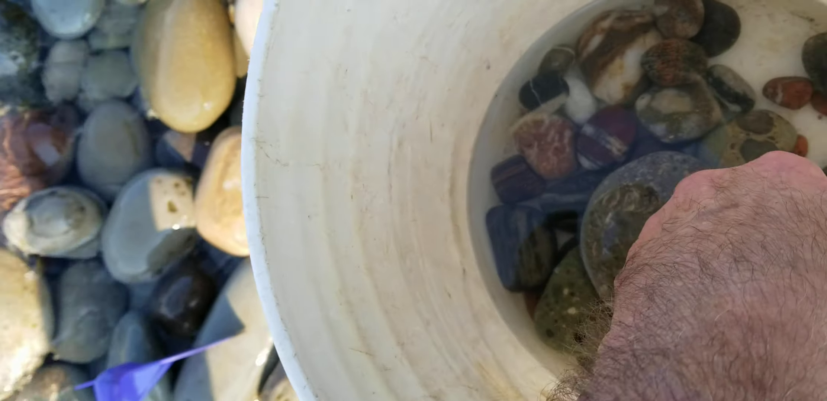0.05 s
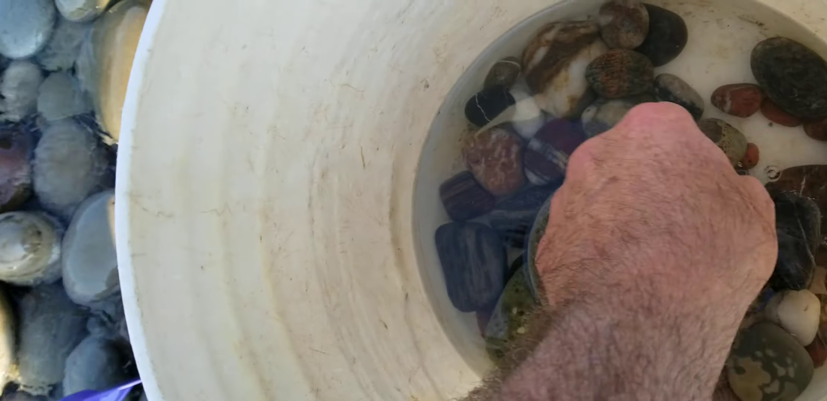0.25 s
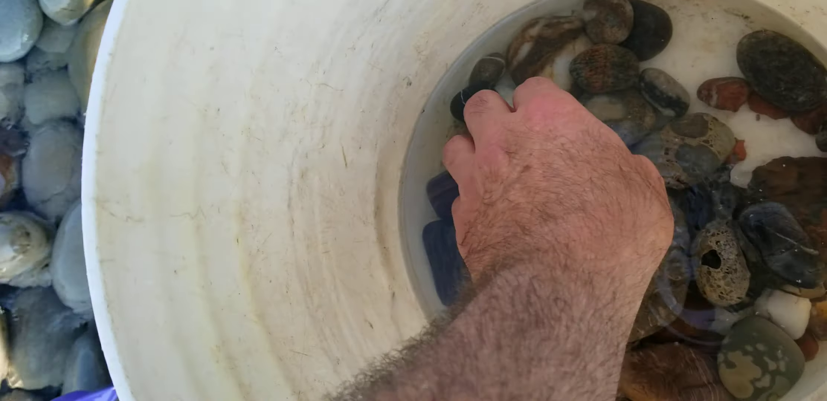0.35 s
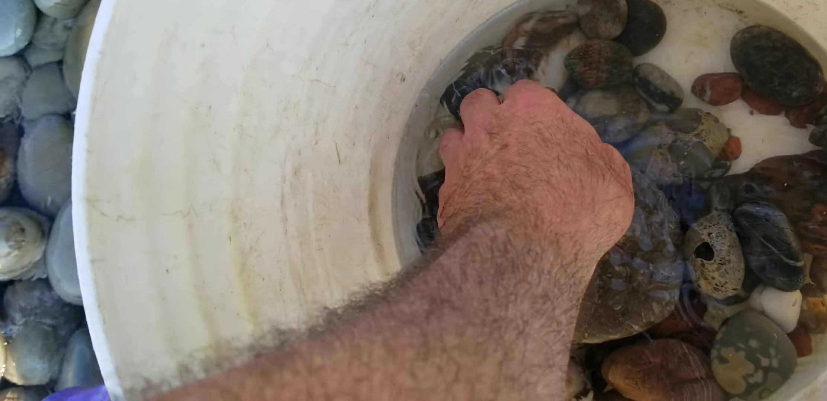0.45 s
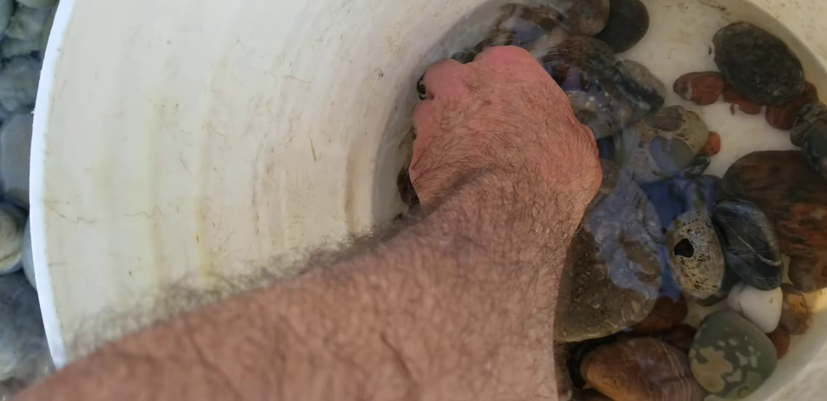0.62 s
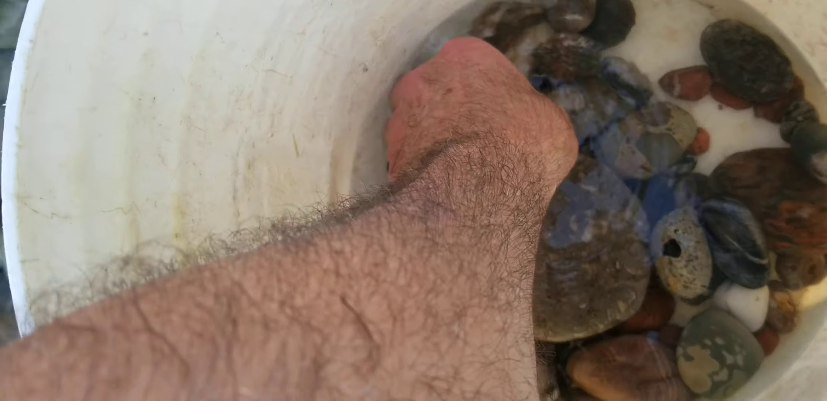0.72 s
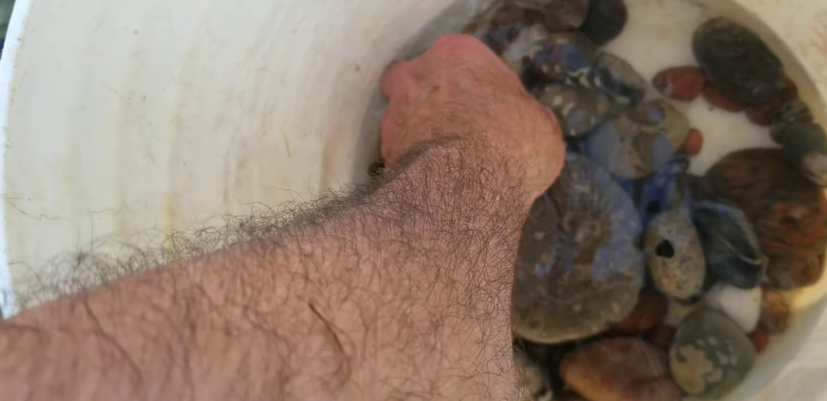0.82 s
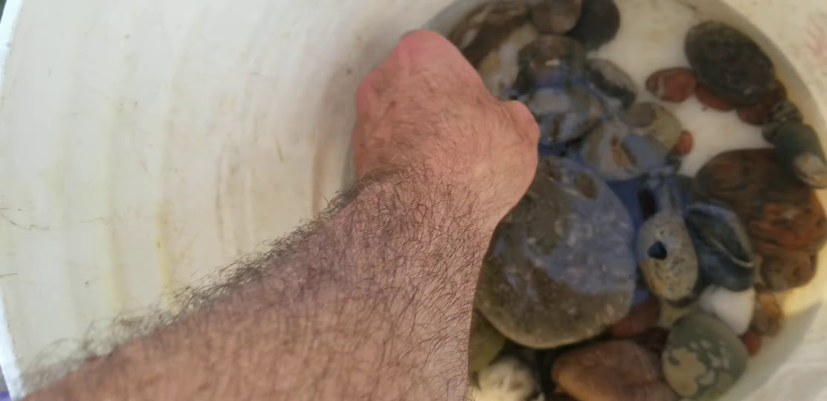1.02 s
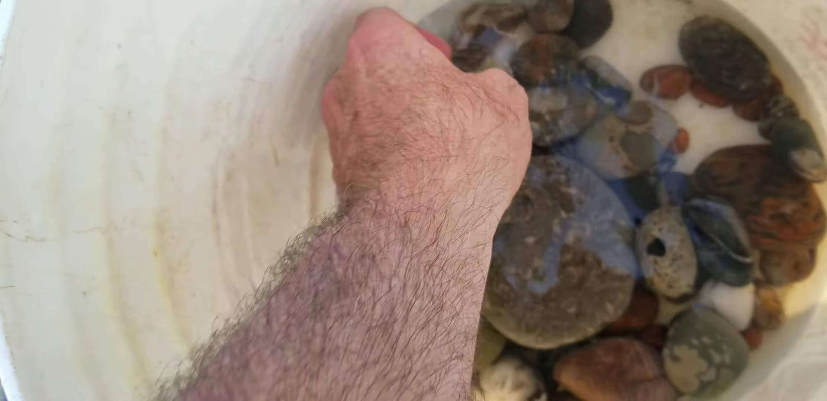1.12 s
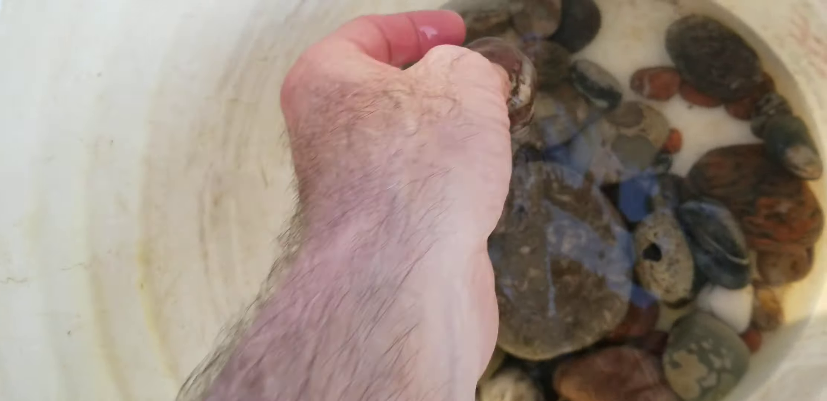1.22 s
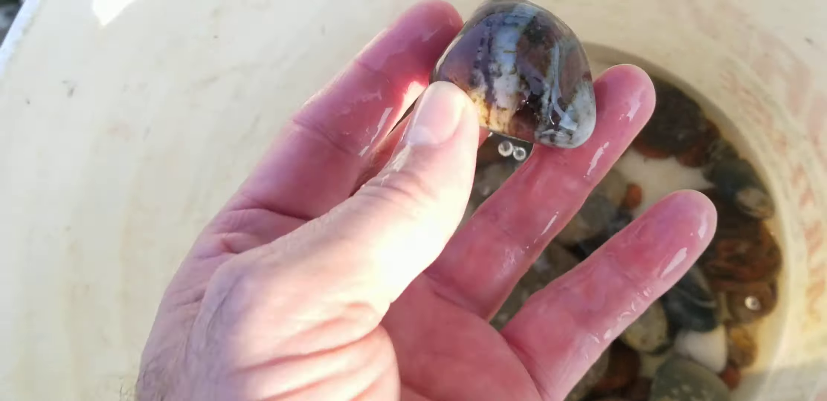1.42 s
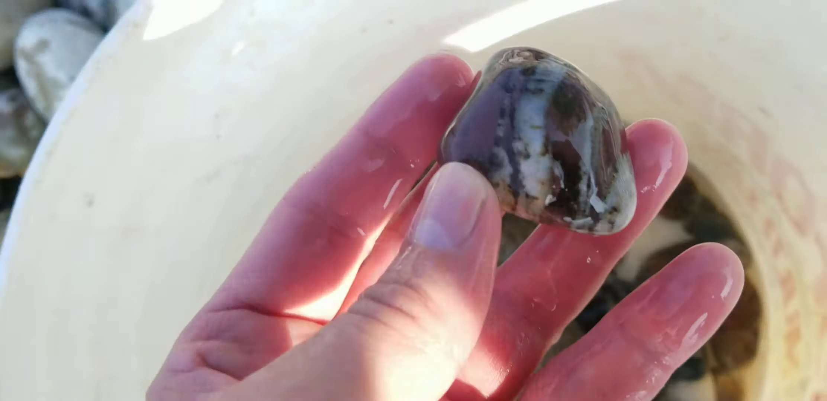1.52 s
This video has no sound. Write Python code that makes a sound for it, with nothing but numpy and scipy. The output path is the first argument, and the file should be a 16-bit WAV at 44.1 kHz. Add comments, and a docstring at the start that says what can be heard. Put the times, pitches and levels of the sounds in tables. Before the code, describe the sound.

Close to the microphone, wet stones clatter in a plastic bucket, turning to muffled knocks and scraping as a hand stirs beneath the water. A few drips plink as it comes out, over light wind rumble and a faint lake.

```python
"""Wet stones collide as a hand digs through them in a plastic bucket, close to the microphone.
They clack above the water, then knock and grind dully under it; each impact excites the bucket's modes.
The hand lifts one stone out and water drips back, trapping bubbles that ring.
Behind it are the faint wash of a lake, wind on the microphone and soft handling bumps."""
import sys
import numpy as np
from scipy import signal
from scipy.fft import rfft, irfft
from scipy.io import wavfile
from scipy.ndimage import uniform_filter1d

SR = 44100
rng = np.random.default_rng(int(sys.argv[2]) if len(sys.argv) > 2 else 0)


def generate_wav(sig):
    """Save sig (samples, or channels by samples) to the path in sys.argv[1] as 16-bit PCM at SR."""
    pcm = np.round(np.clip(np.atleast_2d(sig).T, -1, 1) * 32767).astype(np.int16)
    wavfile.write(sys.argv[1], SR, pcm)


N = 68355
TAPS = 12288  # samples in one impulse response
TREBLE_HZ, TOP_HZ = 3800, 10700  # where the brightness of a contact is set
LEFT_LAG_S = 0.000225  # direct sound reaches the right microphone port first


def amp(db):
    """Amplitude ratio of a level in decibels."""
    return 10 ** (np.asarray(db) / 20)


def unit_rms(x):
    """Normalisation to an rms of 1."""
    return x / np.sqrt(np.mean(x ** 2) + 1e-20)


def decay(t, t60):
    """Exponential damping: 60 dB in t60 seconds."""
    return amp(-60 * t / t60)


def at_frequency(points, hz):
    """Interpolation on a logarithmic frequency axis."""
    f, value = np.transpose(points)
    return np.interp(np.log(hz + 1), np.log(f + 1), value)


def envelope(points):
    """Amplitude envelope of the whole scene from points of t/s, level/dB."""
    return amp(np.interp(np.arange(N) / SR, *np.transpose(points)))


def add(mix, s, sound):
    """Superposition of a stereo sound on the mix at time s."""
    part = mix[:, round(s * SR):][:, :sound.shape[1]]
    part += sound[:, :part.shape[1]]


def colour(x, points, size=4096):
    """Minimum-phase filter through points of f/Hz, gain/dB."""
    log_gain = np.log(amp(at_frequency(points, abs(np.fft.fftfreq(size, 1 / SR)))))
    response = np.exp(np.conj(signal.hilbert(log_gain)))
    taps = np.fft.ifft(response).real[:size // 2]
    return signal.fftconvolve(x, taps[None], axes=1)[:, :x.shape[1]]


def correlate(pair, correlation):
    """Partial coherence: the left of two independent channels takes a share of the right."""
    shared = np.clip(correlation, 0, 1)
    return np.array([shared * pair[1] + np.sqrt(1 - shared ** 2) * pair[0], pair[1]])


def lake(patch_depth_db=4):
    """Modulated noise: the lake's faint wash drifts in patches of time and frequency."""
    spectrum = [(30, 15.5), (200, -3), (420, -6), (750, -12.5), (1200, 1.5), (2500, 0.5), (4000, -5.5),
                (6000, -1), (9000, 1), (12000, 1), (14500, 2.5)]  # f/Hz, relative spectral density/dB
    hz, _, noise = signal.stft(rng.standard_normal((2, N)), SR, nperseg=512)
    patches = uniform_filter1d(rng.standard_normal(noise.shape[1:]), size=8, axis=0)
    patches = unit_rms(uniform_filter1d(patches, size=10, axis=1))
    wash = noise * amp(at_frequency(spectrum, hz)[:, None] + patch_depth_db * patches)
    return amp(-46.5) * unit_rms(signal.istft(wash, SR, nperseg=512)[1][:, :N])


def wind():
    """Turbulent pressure: light gusts rumble, weakly correlated between the microphone ports."""
    spectrum = [(10, -7), (30, -17.5), (55, 4.5), (80, 0.5), (130, -6.5), (200, -18.5), (350, -39),
                (1000, -36), (4000, -108)]  # f/Hz, relative spectral density/dB
    gusts = [(0, -45), (.05, -40), (.13, -46), (.23, -43), (.3, -47.5), (.45, -45.5), (.58, -34),
             (.7, -41.5), (.82, -33), (.95, -41), (1.05, -42.5), (1.28, -41), (1.39, -36.5), (1.55, -44.5)]  # t/s, level/dB
    noise = correlate(rng.standard_normal((2, N)), correlation=0.23)
    rumble = rfft(noise) * amp(at_frequency(spectrum, np.fft.rfftfreq(N, 1 / SR)))
    return unit_rms(irfft(rumble, N)) * envelope(gusts) * amp([[-2.5], [0]])


def handling():
    """Structure-borne sound: each soft bump is a few low gliding cycles that swell and fade."""
    bumps = [(.034, 0.041, -34.5, 110.4, 64), (.192, 0.073, -35, 46, 88.5), (.745, 0.056, -35, 130, 112)]  # t/s, duration/s, level/dB, starting f/Hz, ending f/Hz
    out = np.zeros((2, N))
    for s, length, db, from_hz, to_hz in bumps:
        progress = np.arange(0, length, 1 / SR) / length
        cycles = np.cumsum(from_hz + (to_hz - from_hz) * progress) / SR
        swell = np.sin(np.pi * progress) ** 0.64
        add(out, s, amp(db) * swell * np.sin(2 * np.pi * cycles) * amp([[-6.5], [0]]))
    return out


def reverberation(size=128, delay_s=0.0004):
    """Diffuse reflections in the bucket: the treble dies first, the bass is coherent at the ports."""
    decay_times = [(200, 0.087), (600, 0.1), (1500, 0.09), (3700, 0.036), (6000, 0.037), (10000, 0.02)]  # f/Hz, T60/s
    spectrum = [(200, -10.5), (600, 0.5), (1500, -1.5), (5500, -4), (9000, -3)]  # f/Hz, relative level/dB
    coherence = [(300, 1), (800, 0.13), (2000, 0.023), (6000, 0.061)]  # f/Hz, left-right correlation
    hz, t, field = signal.stft(rng.choice([-1., 1.], (2, TAPS)), SR, nperseg=size)
    hz = hz[:, None]
    t60 = at_frequency(decay_times, hz)
    field = correlate(field, at_frequency(coherence, hz)) * amp(at_frequency(spectrum, hz))
    tail = signal.istft(field * decay(t, t60) / np.sqrt(t60), SR, nperseg=size)[1][:, :TAPS]
    tail = tail * (np.arange(TAPS) / SR > delay_s)
    return tail / np.linalg.norm(tail[1])


def swish(pulses_per_s=1500):
    """Shot noise: water fizzes softly round the hand as it goes in and comes out."""
    levels = [(.15, -67.5), (.29, -50.5), (.5, -40.5), (.62, -60), (1.1, -72), (1.16, -52.5), (1.25, -55),
              (1.33, -62)]  # t/s, level/dB
    spectrum = [(150, -13), (450, -5.5), (750, -7), (1700, -10), (2600, -3.5), (3600, -12), (8000, -15)]  # f/Hz, gain/dB
    pulses = rng.standard_normal(N) * (rng.random(N) < pulses_per_s / SR)
    fizz = signal.fftconvolve(pulses[None], reverberation(), axes=1)[:, :N]
    return unit_rms(colour(fizz, spectrum)) * envelope(levels)


def bubble(hz, db, attack_s=0.00021, glide_per_s=0.8):
    """Minnaert resonance: trapped air rings, rises a little in pitch and reverberates in the bucket."""
    t = np.arange(TAPS) / SR
    amplitude = amp(db) * decay(t, t60=0.027) * (1 - np.exp(-t / attack_s))
    ring = (amplitude * np.sin(2 * np.pi * hz * t * (1 + glide_per_s * t / 2)))[None]
    return ring + amp(6) * signal.fftconvolve(ring, reverberation(), axes=1)[:, :TAPS]


def gurgles(spread_db=3.5):
    """Random bubble resonances: low as the hand stirs, high as water runs off it."""
    runs = [(0.016, 0.304, 286, -62, 267, 517), (0.404, 0.922, 74, -51.5, 300, 550),
            (1.134, 1.518, 140, -50.5, 827, 2734)]  # start t/s, end t/s, rate/(1/s), top level/dB, lowest f/Hz, highest f/Hz
    out = np.zeros((2, N))
    for start, end, per_s, db, low_hz, high_hz in runs:
        count = round(per_s * (end - start))
        for when, pitch, faintness in rng.random(size=(200, 3))[:count]:
            hz = low_hz * (high_hz / low_hz) ** pitch
            add(out, start + when * (end - start), bubble(hz, db - spread_db * faintness))
    return out


def click(direct_db, ping_hz=4500):
    """Impulse response of a sharp contact: a direct pulse and short ping, then the reflections."""
    t = np.arange(TAPS) / SR
    ping = amp(-19.5) * decay(t, t60=0.0036) * np.cos(2 * np.pi * ping_hz * t)
    direct = amp(direct_db - 5) * (signal.unit_impulse(TAPS) + ping)
    return np.array([np.roll(direct, round(LEFT_LAG_S * SR)), direct]) + amp(8.5) * reverberation()


def drops():
    """Drop impact and air entrainment: water spits off hand and stone, and drips trap bubbles."""
    drips = [(1.139, 1735, -37), (1.212, 1670, -40), (1.213, 2900, -47.5), (1.228, 1140, -46),
             (1.317, 2920, -43.5), (1.367, 901.5, -41.5), (1.378, 2360, -27.5), (1.377, 2810, -37),
             (1.407, 2246, -36.5), (1.476, 626, -46)]  # t/s, f/Hz, level/dB
    spits = [(0.884, -39, 13), (0.972, -34, 15.5), (1.138, -12.5, -7), (1.223, -29, 9), (1.261, -27.5, 11),
             (1.276, -24, 4), (1.32, -25, -2), (1.368, -16.5, -0.5), (1.378, -17.5, -4), (1.452, -34.5, 18),
             (1.476, -33.5, 18)]  # t/s, level/dB, gain at TOP_HZ/dB
    spit_spectrum = [(300, -14.5), (1500, -10), (3200, -16.5), (5500, 1.5), (8000, 3), (14000, -7)]  # f/Hz, gain/dB
    out = np.zeros((2, N))
    for s, hz, db in drips:
        add(out, s, bubble(hz, db))
    for s, db, top_db in spits:
        tick = colour(click(direct_db=1.5), spit_spectrum)
        add(out, s, amp(db) * colour(tick, [(TREBLE_HZ, 0), (TOP_HZ, top_db)]))
    return out


def mode(hz, db, t60, left_lead_s=0.00011):
    """A damped normal mode, with a phase difference between the ports."""
    t = np.arange(TAPS) / SR
    return amp(db) * decay(t, t60) * np.cos(2 * np.pi * hz * (t + np.array([[left_lead_s], [0]])))


def impact(s, thump_db, treble_db, top_db, tock=0, detune=0.0024, air_below_hz=1000):
    """Modal excitation: a contact at time s rings the bucket; water over the stones takes the treble."""
    modes = [(243, -36, 0.11), (398, -44.5, 0.15), (731.7, -30, 0.082), (1242.6, -36, 0.14),
             (1562, -35.5, 0.071), (1623, -45, 0.055), (1700, -37.5, 0.062), (1838, -36.5, 0.075),
             (2200, -34.5, 0.038), (2660, -25.5, 0.059), (4770, -32, .028), (5370, -32.5, 0.022),
             (5900, -35.5, 0.028)]  # of the air, the walls and the stones: f/Hz, level/dB, T60/s
    air_pitch = [(.36, 0.99), (.5, 1.025), (.68, 1.07), (.82, 1.045), (1.09, 1.045)]  # air modes rise as the arm reaches in: t/s, frequency ratio
    contact_spectrum = [(40, -6.5), (150, -8.5), (250, 0), (340, -12), (500, -15.5), (740, 1), (950, -8),
                        (1600, 0.5), (2400, 1), (3200, -8), (5500, -1.5), (8000, 1), (15000, -11.5)]  # f/Hz, gain/dB
    shifts = 1 + detune * rng.uniform(-1, 1, len(modes))
    rise = np.interp(s, *np.transpose(air_pitch))
    ring = sum(mode(hz * shift * (rise if hz < air_below_hz else 1), db, t60)
               for (hz, db, t60), shift in zip(modes, shifts))
    contact = click(direct_db=0.13 * top_db)  # depth also muffles the direct pulse
    tone = [(275, thump_db), (1210, 0), (1744, 0), (TREBLE_HZ, treble_db), (TOP_HZ, top_db)]
    return colour(colour(contact + ring + tock, contact_spectrum), tone)


def grinding(places=8, slips_per_s=750, spread_db=14):
    """Stick-slip friction of submerged stones; the place that grinds moves on with the hand."""
    levels = [(.18, -64.5), (.29, -39), (.5, -22), (0.571, -39.5), (0.611, -29.5), (0.669, -29.5),
              (.72, -21), (.78, -23.5), (0.851, -22), (0.889, -34), (.95, -23), (0.998, -34.5), (1.05, -31),
              (1.09, -27), (1.122, -35.5), (1.152, -40.5)]  # t/s, level/dB
    out = np.zeros((2, N))
    moments, step = np.linspace(levels[0][0], levels[-1][0], places, retstep=True)
    for s in moments:
        share = np.maximum(1 - abs(np.arange(N) / SR - s) / (2 * step), 0) / 2
        slips = (rng.random(N) < slips_per_s * share / SR) * rng.choice([-1, 1], N)
        force = slips * amp(spread_db * rng.uniform(-0.8, 1, N)) * envelope(levels)
        response = impact(s, thump_db=4, treble_db=-23, top_db=-58)
        out += signal.fftconvolve(force[None], response, axes=1)[:, :N]
    return out


def snap(width_s=0.000019):
    """Acceleration noise: a stone stopped dead sends one push and pull of air straight to the ports."""
    t = np.arange(TAPS) / SR - np.array([[LEFT_LAG_S], [0]])
    u = t / width_s - 2
    return -u * np.exp(-u ** 2 / 2) * amp([[-1.5], [-3]])


def knocks():
    """Collisions of stones: each contact favours one pitch, its tock; bright ones above water snap."""
    # t/s, level/dB, thump gain/dB, treble gain/dB, top gain/dB, tock f/Hz, relative tock level/dB
    collisions = [(.3089, 11.5, 6.5, 1.5, -6, 1830, -4), (.3150, -5.5, -0.5, 17.5, -4.5, 1600, 19),
                  (0.3473, 4.5, -10, 0, 6.5, 5680, 1.5), (.3541, 12.5, 0.5, -10, -16, 1584, -9),
                  (.3980, 9, -5, 6.5, -1, 1620, 3.5), (.4522, -10, 15.5, 13.5, -6, 4250, -1),
                  (0.4578, 10, -13.5, -2, -5, 5540, -6), (0.4958, 5.5, -2.5, -3, -11.5, 1762, 3.5),
                  (.5197, 2, -1, 1.5, -15.5, 5800, 0.5), (0.5465, -4, 1, -6, -20, 1780, -17),
                  (.5610, -4.5, -46, -5.5, -30, 1280, -3), (.5685, -6.5, -1, -12, -29, 1765, -8),
                  (0.6857, 2, 2, -10, -29.5, 1235, 2), (.6945, -0.5, 1, -5, -27.5, 1430, 3),
                  (0.7002, -7.5, -16, -25, -43, 1735, 9.5), (0.745, -10.5, -14, -24, -39, 1280, 5),
                  (.7660, -17, -16, -11.5, 2, 1660, -1), (.8010, -4.5, -4, -20, -38, 1680, -17),
                  (0.838, -4, -8, -18, -37, 1420, -11), (0.856, -11.5, 18, -10, -50, 1700, -3),
                  (.9310, 4, -14, -13, -33.5, 1790, 1.5), (.9635, -2, -15, -17.5, -28, 1694, -6),
                  (1.012, -10.5, -16, -37, -41, 770, 11), (1.0240, -6, 2, -6, -34, 2010, -7),
                  (1.0420, -7, 4, -5.5, -33, 1710, -21), (1.0833, 1, -15.5, -13, -39, 1235, 7.5),
                  (1.0842, -1.5, 0, -6.5, -44, 1910, 7.5)]
    out = np.zeros((2, N))
    for s, db, thump_db, treble_db, top_db, tock_hz, tock_db in collisions:
        tock = mode(tock_hz, tock_db - 22, t60=0.041)
        add(out, s, amp(db) * impact(s, thump_db, treble_db, top_db, tock))
        add(out, s, amp(db + (treble_db + top_db) / 2) * snap())
    return out


def scene():
    """Superposition of the stones and water in the bucket and their background."""
    return knocks() + grinding() + drops() + swish() + gurgles() + lake() + wind() + handling()


def record(dry, threshold_db=-22, max_duck_db=7.5, sink_db_per_s=0.37, cutoff_hz=14800):
    """Transduction: port responses, peak-holding gain control, soft saturation and a band limit."""
    left_port = [(100, -1), (260, 3), (750, -3), (1600, -5), (3200, -1.5), (5500, -3.5), (8500, -11),
                 (12000, -4), (14500, -6)]  # f/Hz, gain/dB
    right_port = [(100, 3.5), (2400, 0.5), (3200, 2.5), (4400, 7.5), (5900, 8.5), (7200, -6), (8700, -17.5),
                  (11000, -1.5), (13000, -2.5), (14500, -22)]  # f/Hz, gain/dB
    x = np.vstack([colour(dry[:1], left_port), colour(dry[1:], right_port)])
    power_db = 10 * np.log10(abs(uniform_filter1d((x ** 2).mean(0), size=128)) + 1e-12)
    excess_db = np.clip(power_db - threshold_db, 0, max_duck_db)
    # the gain drops at a loud clack and goes on sinking slowly
    sink_db = np.arange(N) / SR * sink_db_per_s
    duck_db = np.maximum.accumulate(excess_db - sink_db) + sink_db
    x = np.tanh(x * amp(-uniform_filter1d(duck_db, size=64)))
    lowpass = signal.firwin(255, cutoff_hz, window=("kaiser", 8), fs=SR)
    return signal.oaconvolve(x, lowpass[None], "same")


dry = scene()
out = record(dry)
generate_wav(out)
```